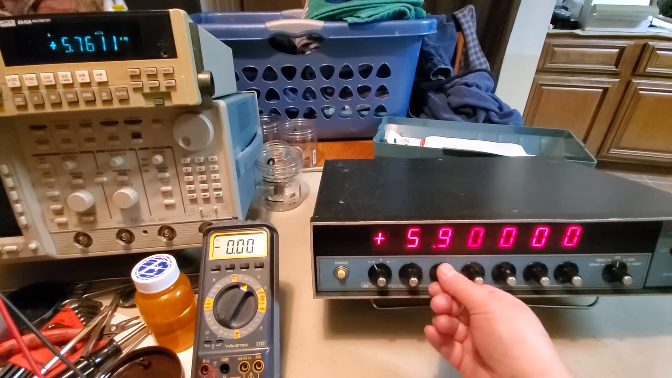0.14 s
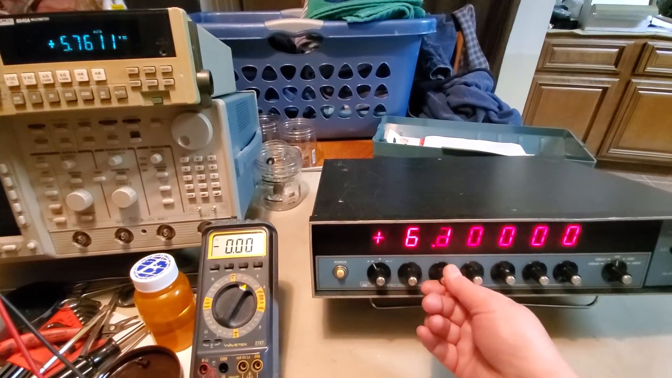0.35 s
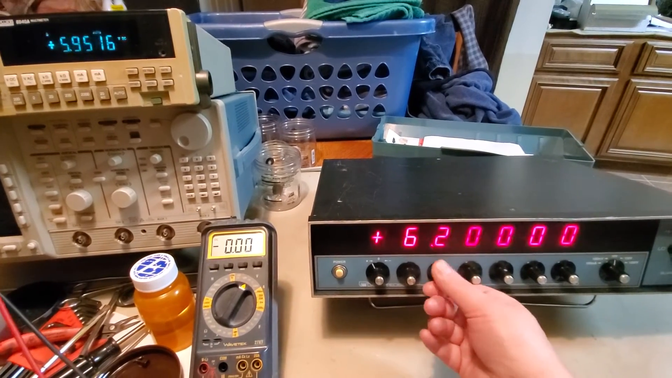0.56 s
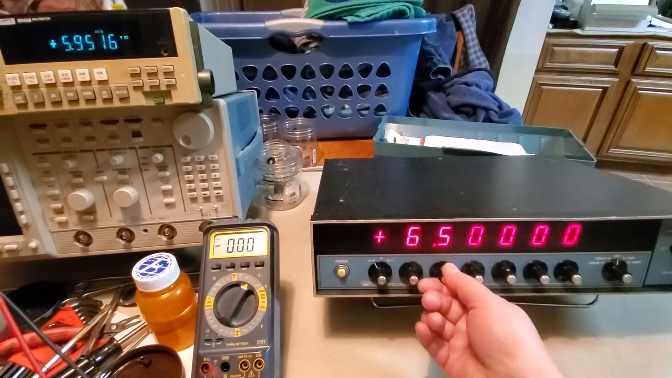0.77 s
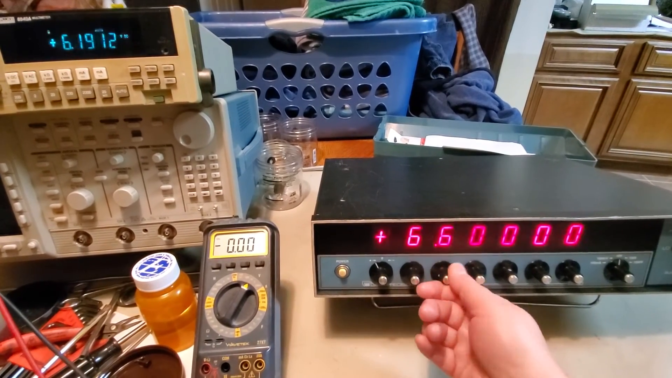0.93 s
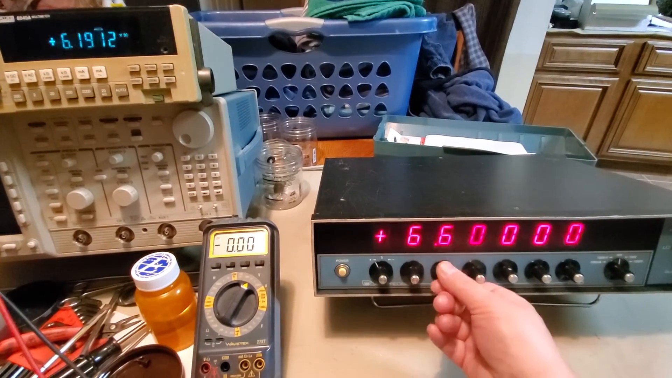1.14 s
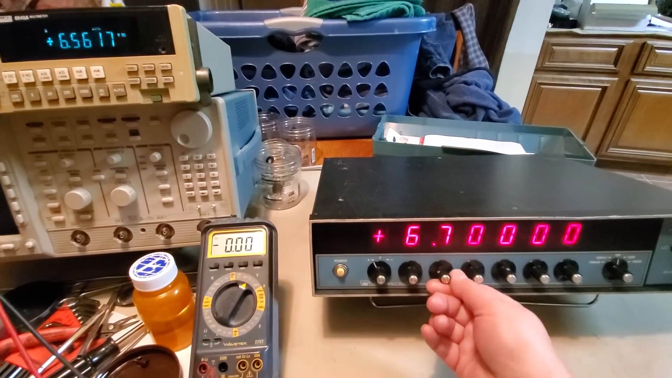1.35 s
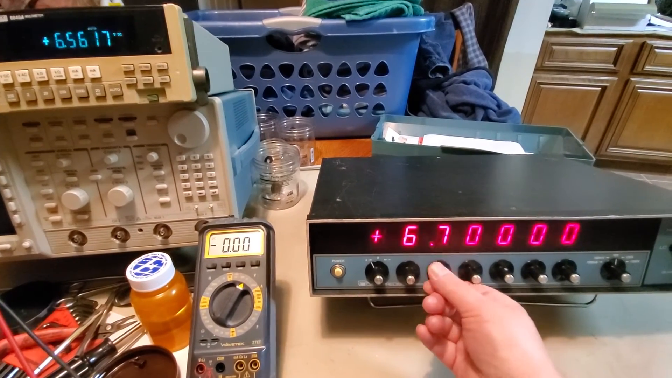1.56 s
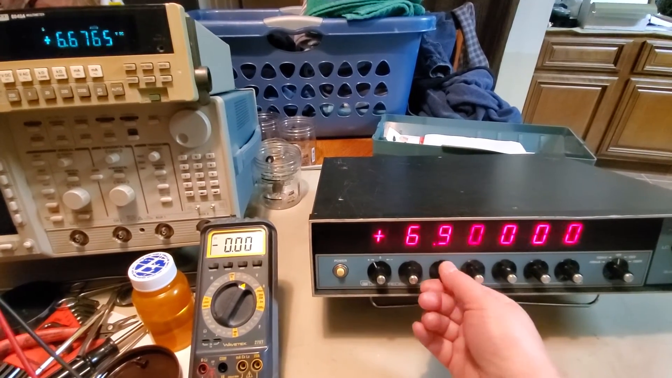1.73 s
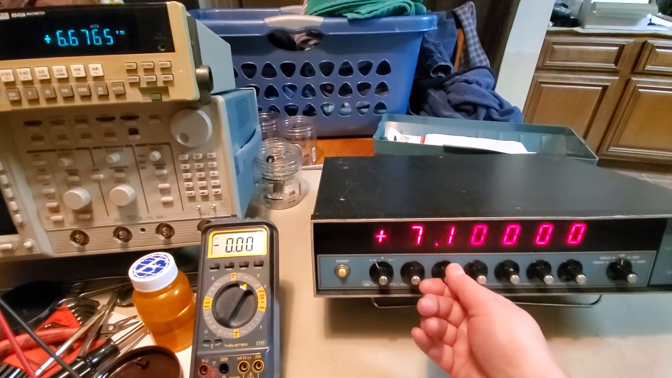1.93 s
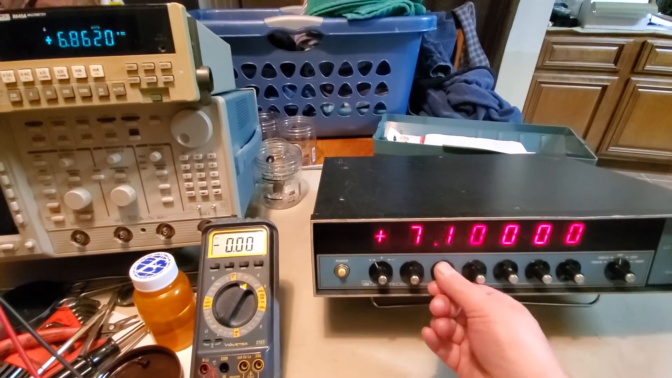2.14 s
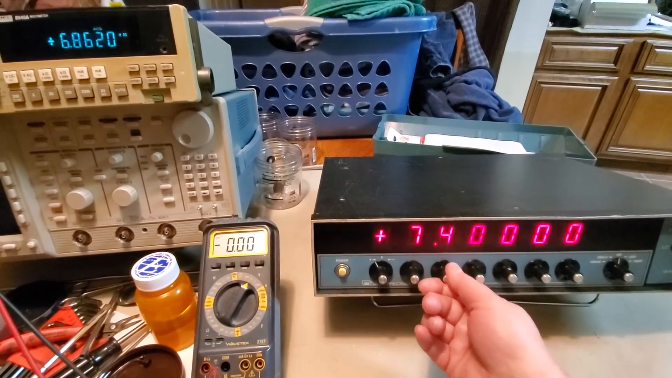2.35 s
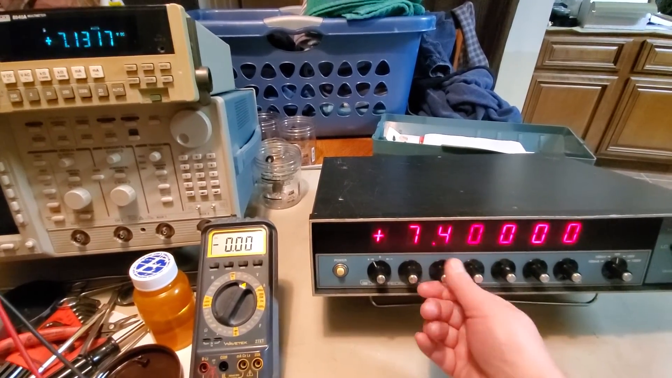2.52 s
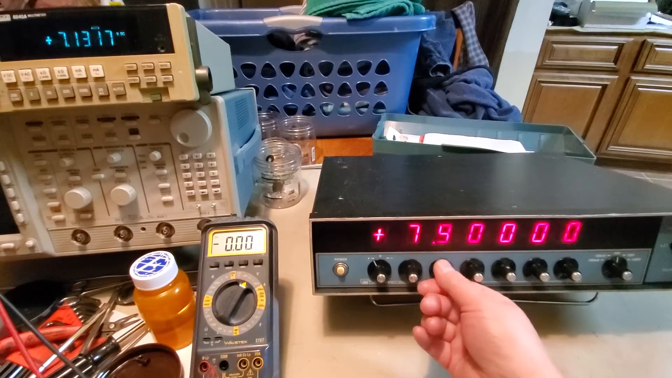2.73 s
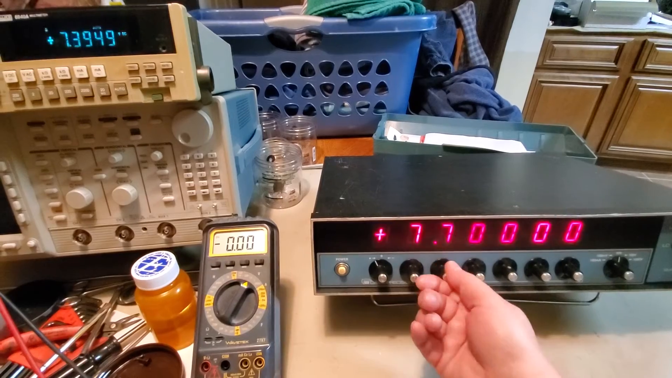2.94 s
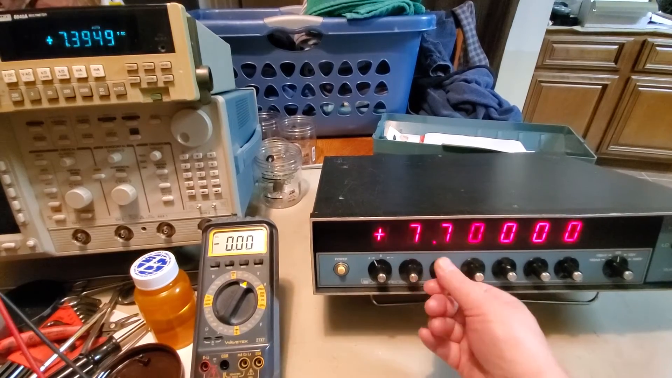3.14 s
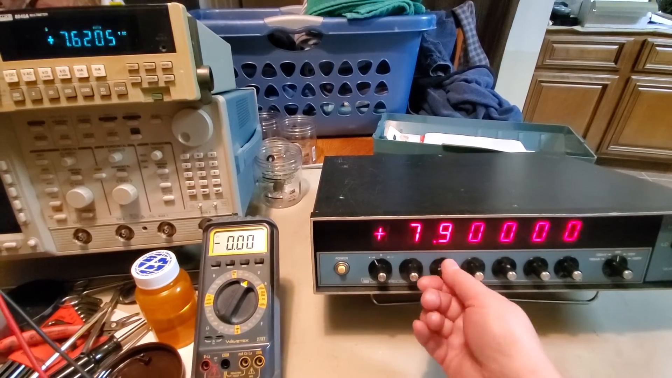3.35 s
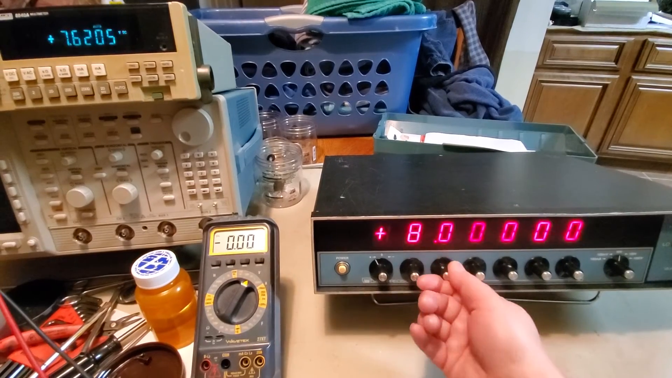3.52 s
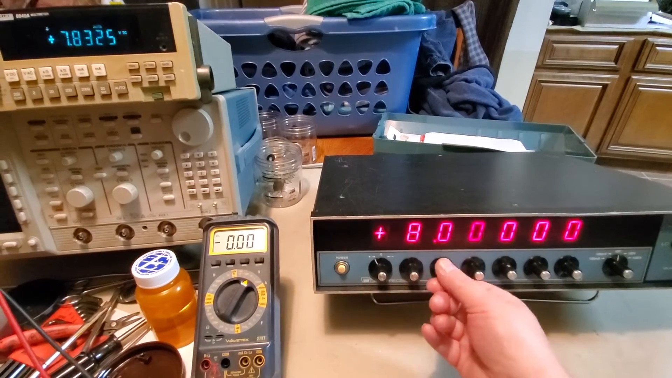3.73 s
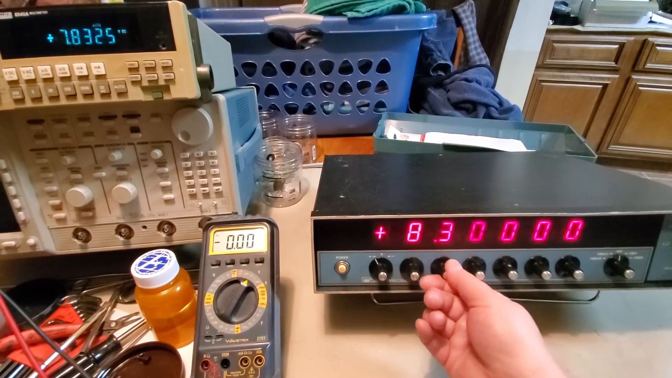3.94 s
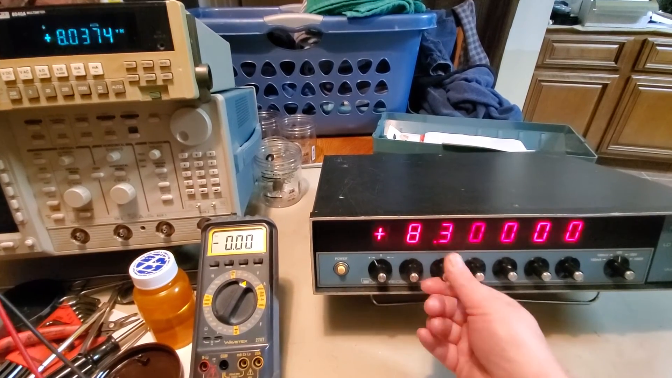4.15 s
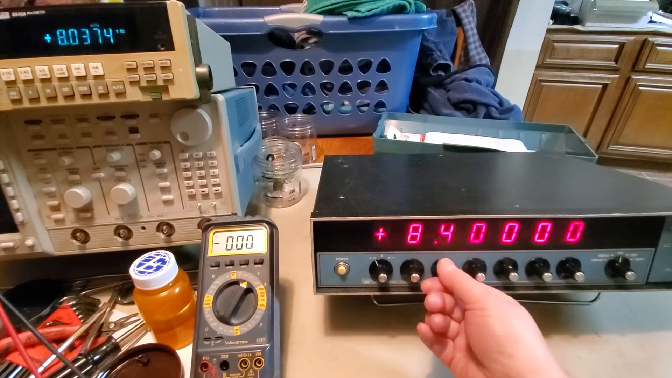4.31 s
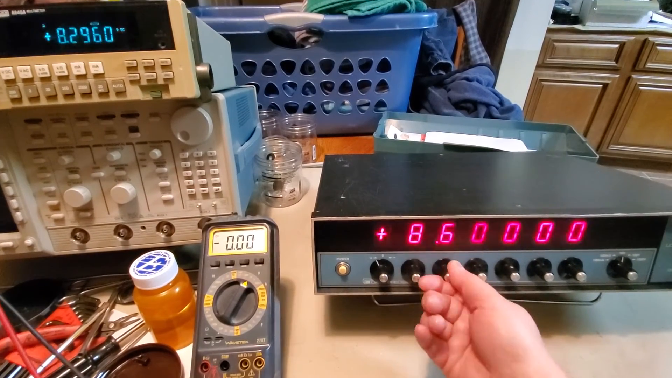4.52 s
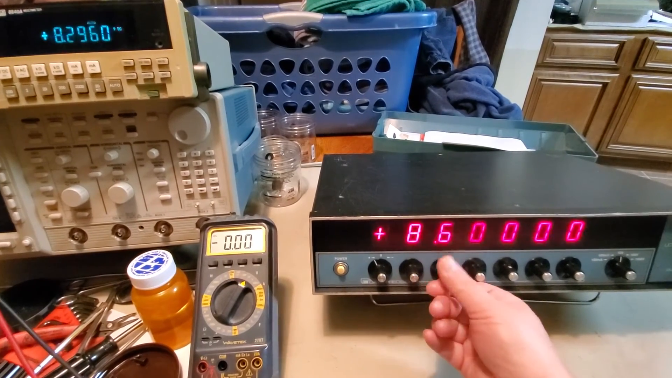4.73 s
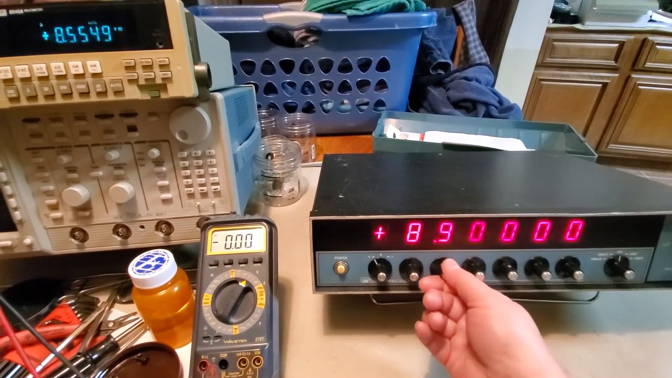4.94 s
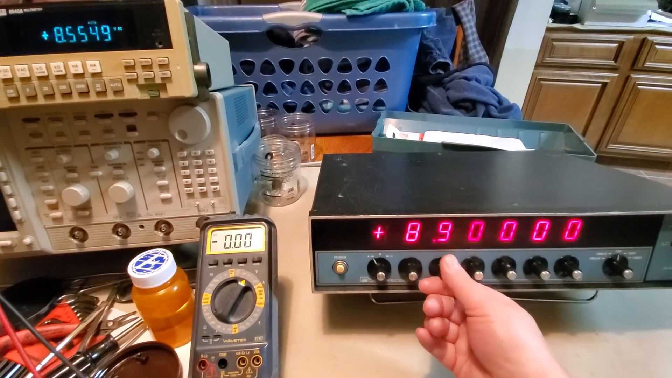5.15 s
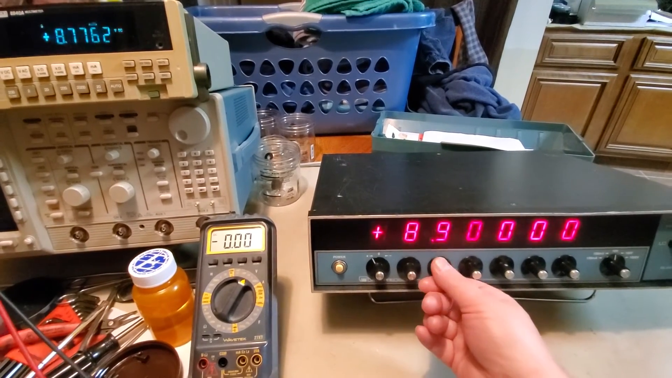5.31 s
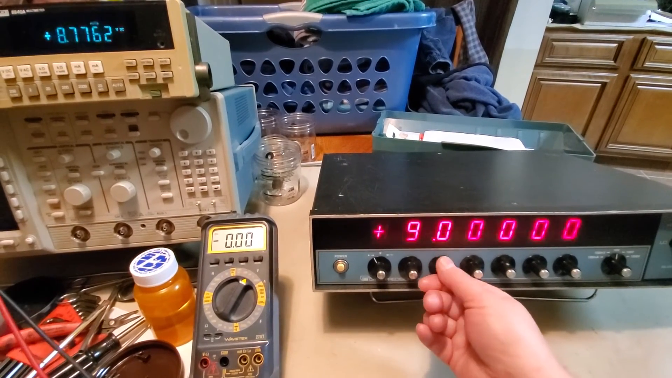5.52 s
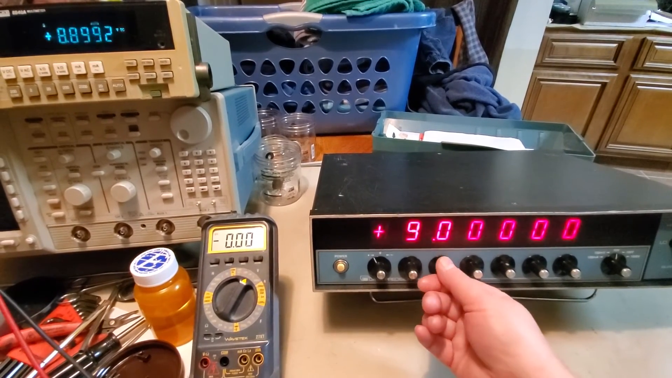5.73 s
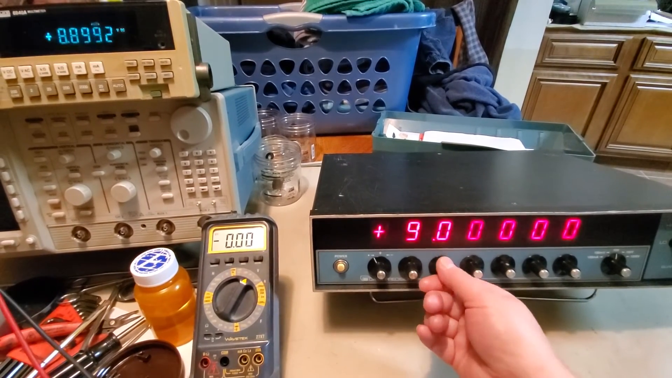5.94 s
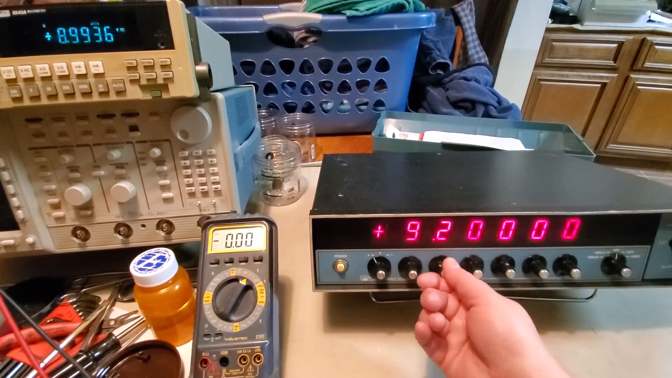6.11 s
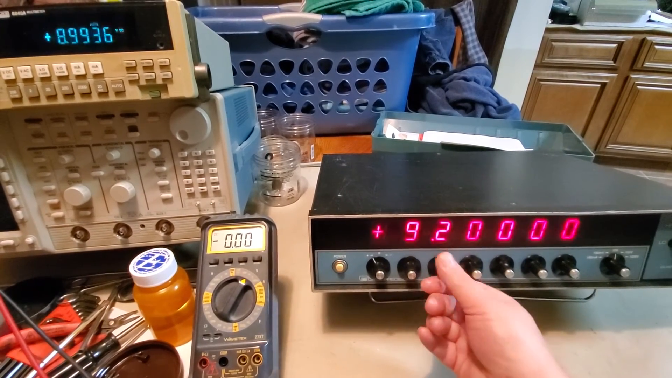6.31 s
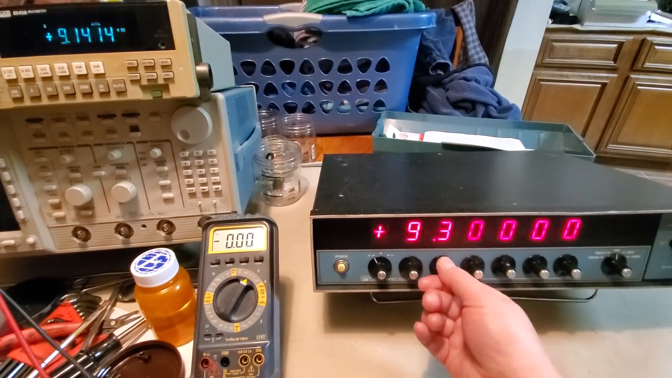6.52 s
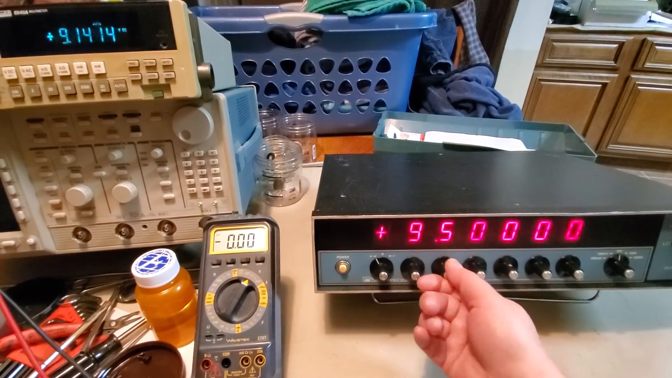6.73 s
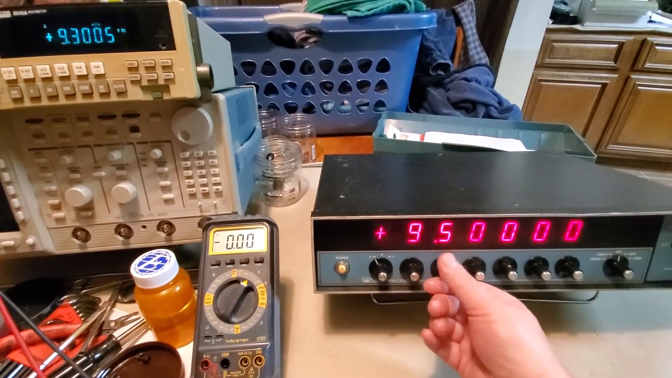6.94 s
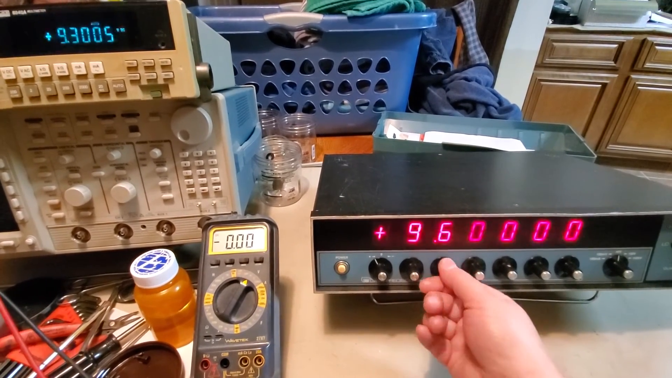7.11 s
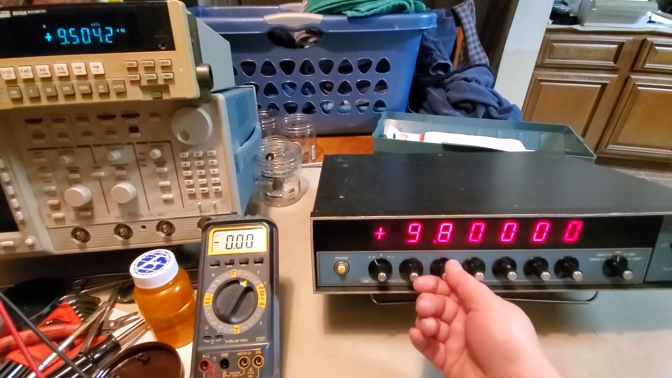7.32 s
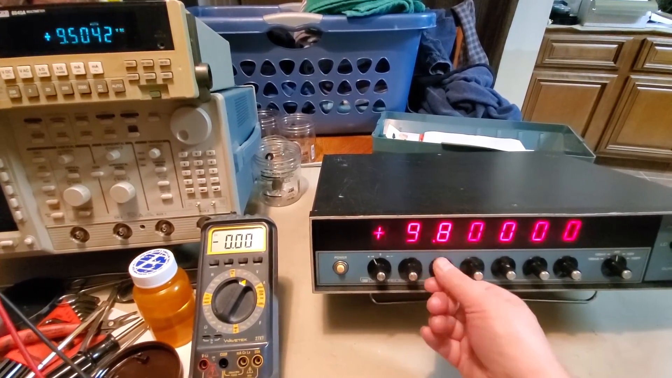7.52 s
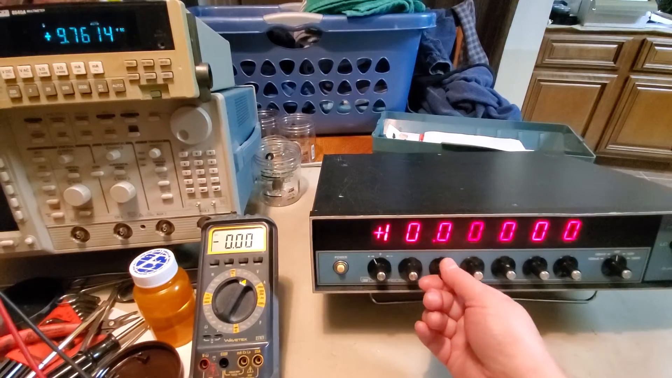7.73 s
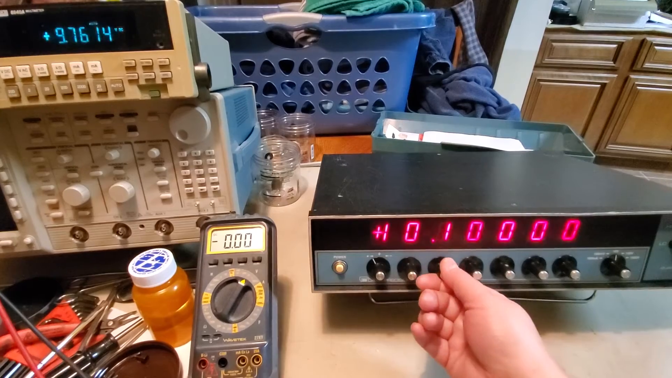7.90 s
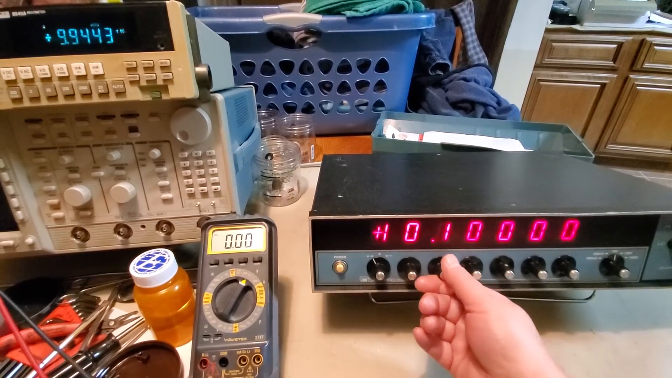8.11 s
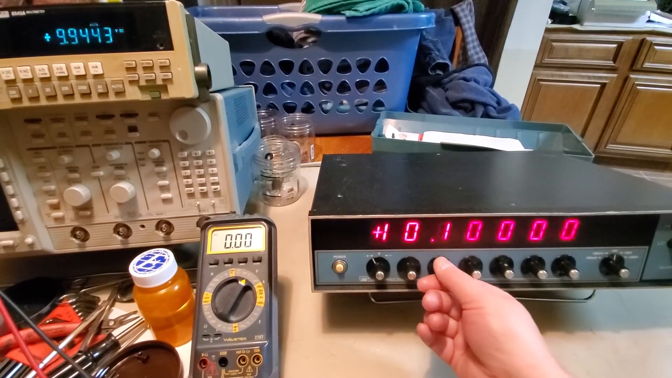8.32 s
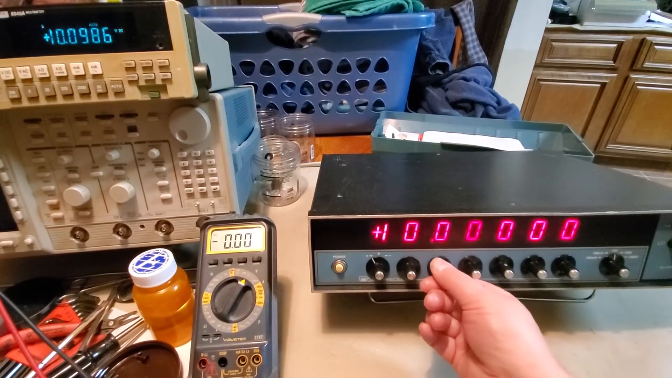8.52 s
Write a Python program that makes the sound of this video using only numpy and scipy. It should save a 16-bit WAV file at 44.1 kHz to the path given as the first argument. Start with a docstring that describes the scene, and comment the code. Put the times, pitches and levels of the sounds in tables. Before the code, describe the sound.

A detented rotary knob on a metal electronics case is clicked around in quick bursts of two or three crisp steps, over a quiet low hum.

```python
"""Detented rotary switch on a sheet-metal case

A switch left of a two-port microphone is turned in bursts of steps; the wheel's slack ticks faintly.
Each step rings spring and case modes under a noise crack; a small room answers with noise tails.
Fingers and wheel rub as gritty noise; one cluster of knocks sounds decaying bench modes.
Behind: wavering sines for motor, hums, whine and deep swells; shaped noise for rumble, fans and hiss.
"""
import sys
import numpy as np
from scipy import signal
from scipy.fft import rfft, irfft, next_fast_len
from scipy.io import wavfile
from scipy.ndimage import uniform_filter1d, map_coordinates

SR = 44100
rng = np.random.default_rng(int(sys.argv[2]) if len(sys.argv) > 2 else 0)


def volts(x):
    """Linear amplitude factor 10**(x/20) for a level x in dB, scalar or array-like."""
    e = np.asarray(x, float) / 20
    return 10 ** e


def store_pcm(level_fs):
    """Save levels as 16-bit WAV."""
    pcm = np.round(np.clip(level_fs, -1, 1) * 32767).astype(np.int16)
    wavfile.write(sys.argv[1], SR, np.atleast_2d(pcm).T)


N = 377580

# detent steps; last three relative to level_db: start_s, level_db, case_db, fizz_db, body_db
STEPS = [(0.2335, -25.5, -8, -8, -18.5), (0.3055, -24.5, -13.5, -12, -13.5), (0.4508, -27, -6.5, -7, -13.5),
         (0.7407, -24, -9.5, -9, -16), (0.7709, -22, -7, -9, -12.5), (0.7999, -23.5, -6.5, -6.5, -23),
         (0.8912, -26, -10, -8.5, -20), (1.259, -21.5, -12, -16, -16.5), (1.722, -27, -8, -12.5, -15.5),
         (1.7694, -25.5, -9, -9.5, -17), (1.8289, -23, -11.5, -11, -18), (2.2438, -25, -9, -11.5, -21.5),
         (2.2911, -20.5, -5, -7, -23.5), (2.323, -22, -4.5, -8, -24.5), (2.393, -26, -9.5, -8.5, -18.5),
         (2.8048, -23, -8.5, -10.5, -19), (2.8752, -24, -12.5, -11.5, -22.5),
         (2.9578, -26.5, -8, -9, -23.5), (3.3401, -20, -10.5, -11, -14), (3.381, -27.5, -2.5, -7, -11),
         (3.467, -28.5, -8.5, -9.5, -14), (3.8769, -24, -4.5, -11, -16.5), (3.918, -25, -8.5, -7.5, -20.5),
         (3.986, -27, -8, -8.5, -16), (4.388, -26.5, -4.5, -4, -13), (4.4233, -22.5, -10.5, -11.5, -19),
         (4.4817, -25, -10, -8.5, -14.5), (4.8975, -25, -8, -10.5, -20), (4.9326, -23, -10.5, -8.5, -16.5),
         (4.9768, -24.5, -10, -11, -19.5), (5.5967, -26.5, -10, -12, -22.5),
         (6.0374, -29.5, -9, -11, -21.5), (6.155, -27, -13, -15.5, -21.5), (6.572, -25.5, -7, -9, -15.5),
         (6.623, -27, -7, -9, -19.5), (6.7244, -27, -7, -7, -20), (7.152, -24, -6.5, -9.5, -18),
         (7.2076, -26, -11, -10.5, -14.5), (7.293, -25.5, -10, -10.5, -15.5),
         (7.7041, -25.5, -3.5, -9, -15.5), (7.7668, -24.5, -6, -6, -18.5),
         (7.8828, -27.5, -10.5, -9.5, -20.5), (8.5554, -32.5, -5.5, -11, -17.5)]
# faint ticks of slack in the wheel, same columns: start_s, level_db, case_db, fizz_db, body_db
TICKS = [(0.7123, -54, 13.5, -9.5, 7), (0.984, -61.5, 4, 2.5, 32), (1.2012, -53.5, 12, -11.5, 22),
         (1.218, -63, 15.5, -7.5, 9), (1.3365, -36.5, 2, -10.5, 8.5), (1.459, -64.5, 6.5, 10, 2),
         (2.7683, -51, 11, -13, 10), (3.8083, -66, 3.5, 17.5, 0.5), (3.8156, -61, 17.5, 9.5, 20),
         (5.9995, -58.5, 10, -15, -12.5), (6.4807, -62.5, 5, -9, 16), (6.521, -50, 3.5, -10, -1.5),
         (7.0975, -64.5, 16, -2, 29), (7.6605, -51.5, 5.5, -17.5, 9)]
# detent spring and wheel modes: pitch_hz, level_db, t60_s
SPRING_MODES = [(4756, -8.5, 0.038), (4926, -4.5, 0.045), (5326, -3, 0.026), (5630, 1, 0.037),
                (5925, 0, 0.016), (6254, 1.5, 0.012), (6680, -5, 0.024)]
# sheet-metal case modes: pitch_hz, level_db, t60_s
CASE_MODES = [(1449, -7.5, 0.13), (1811, -3.5, 0.1), (1994, -4.5, 0.099), (2472, -1.5, 0.056),
              (2732, -4.5, 0.087), (2933, 2.5, 0.062), (3400, -27.5, .04), (3958, 3, 0.05), (4300, -6, .04)]
# contact crack, relative spectrum: freq_hz, level_db
CRACK_SPECTRUM = [(290, -49), (500, -26), (731, -30.5), (1430, -14), (2390, -7), (2980, 7), (3600, -6),
                  (4900, 0), (6660, -2.5), (7270, -9.5), (14700, -11.5), (15800, -29), (16500, -54)]
# contact crack decay: freq_hz, t60_s
CRACK_DECAY = [(800, 0.33), (2500, 0.066), (6000, 0.038), (9000, 0.057), (14000, 0.059)]
# left minus right level: freq_hz, level_db
PORT_LEAN = [(700, -13), (1300, -3), (2400, 6), (4400, 3.5), (8000, -5), (15000, -0.5)]
# phase by which the left port leads: freq_hz, lead_rad
PORT_LEAD = [(0, 0), (1000, -.2), (1720, -1.2), (2400, -.4), (3100, 3), (3800, 1.6), (4480, -.4),
             (5170, -3.4), (5860, -2.3), (6550, .8), (7240, .8), (8300, -1.5), (9700, 1.4), (11400, .5),
             (12800, -1.8)]
# room decay: freq_hz, t60_s
ROOM_DECAY = [(300, 0.32), (1300, 0.61), (3500, 0.27), (5700, 0.19), (9000, 0.29), (16000, 0.15)]
# finger and wheel rubs; brightness is at 7 kHz and up: start_s, level_db, length_s, bright_db
RUBS = [(.155, -55.5, 0.12, 6), (0.388, -58.5, .05, 11.5), (0.704, -55.5, 0.027, -4),
        (1.21, -52, 0.046, 1.5), (1.312, -40.5, .05, 4.5), (1.359, -56, 0.053, 5.5),
        (1.69, -63.5, 0.038, -1), (.92, -58.5, 0.055, 0.5), (1.935, -55.5, .06, 9), (2.201, -59, 0.047, 2),
        (2.751, -54, 0.04, 2.5), (3.296, -55, 0.047, -3), (3.843, -60.5, 0.031, 3), (4.345, -58, .035, 1.5),
        (4.86, -61, 0.047, -3), (5.102, -60.5, .08, -3), (5.469, -63, 0.079, 10), (5.985, -59, 0.044, 6),
        (6.481, -53, 0.064, -2.5), (6.52, -63, 0.057, 4), (7.093, -57, 0.064, 1), (7.655, -59, 0.033, 2),
        (8.312, -61.5, .03, -10)]
# rub noise, relative spectrum: freq_hz, level_db
RUB_SPECTRUM = [(300, -37), (700, -3.5), (1300, -0.5), (2000, 2.5), (3000, -5.5), (5000, -12), (12000, -26),
                (16000, -38.5)]
# case on bench: start_s, level_db, tilt_db_per_octave
KNOCKS = [(1.244, -45.5, 5), (1.265, -36.5, 4), (1.317, -42, -6), (1.329, -34.5, -1), (1.339, -27.5, 3),
          (1.374, -49.5, 9.5), (1.395, -44.5, 4)]
# bench top modes: pitch_hz, level_db, t60_s
BENCH_MODES = [(134.4, -13.5, 0.36), (185, -5.5, 0.2), (212.1, -2, 0.23), (263.8, -3.5, 0.22),
               (288.2, 6, 0.088), (340.8, -11, 0.21), (477.7, 2, 0.068), (560, -10, 0.089), (742, -9, .05),
               (1010, -16, 0.058)]
# far motor level: time_s, level_db
MOTOR_LEVEL = [(0, -49.5), (.43, -45.5), (.9, -51), (1.8, -48), (2.5, -52), (2.65, -60), (2.88, -50),
               (3.4, -62.5), (4.2, -64), (4.8, -65), (5.03, -51), (5.2, -62.5), (5.5, -57), (6.1, -63),
               (7.3, -60), (7.7, -63.5), (8, -57), (8.56, -72.5)]
# hums at rest and per unit of wake power: pitch_hz, rest_db, wake_db
HUMS = [(41.5, -68.5, -80.5), (96.2, -69, -68.5), (115.2, -67, -70.5), (145.7, -72, -75),
        (243.2, -66.5, -60.5)]
# hum wake: rise_s, fall_s
HUM_WAKE = (0.045, .08)
# thin whine of transformers and fans: pitch_hz, level_db
WHINE = [(559.9, -80.5), (1039, -85.5), (1195, -83.5), (1680, -88.5), (1922, -83.5), (2040, -82),
         (2159, -88.5), (2622, -83)]
# deep tones, perhaps traffic: middle_s, pitch_hz, level_db, length_s
SWELLS = [(.35, 48.6, -54, 0.8), (1.3, 56.1, -61, 0.62), (1.596, 48.3, -60, 0.48), (2.267, 45, -53, .25),
          (2.501, 55.56, -57, 1.1), (2.851, 48.1, -56, .4), (3.1, 56.1, -54, 1.34), (4.014, 56.9, -61, 1.8),
          (5.104, 48, -59.5, .4), (5.097, 56.8, -64.5, 0.48), (5.5, 41.5, -50, 1.02),
          (6.13, 41.5, -55.5, .5), (6.656, 41.5, -54.5, 0.68), (7.146, 56.4, -57, 0.59),
          (7.491, 41.5, -59, 0.32), (7.749, 56.1, -62, .4)]
# background noise at rest: time_s, rumble_db, fan_db, hiss_db
AIR_LEVELS = [(0, -52, -63.5, -70), (1, -54, -63.5, -70.5), (2.2, -54, -63.5, -73), (3.3, -55, -63.5, -70),
              (4.7, -56, -64, -72.5), (5.8, -56, -65, -75.5), (6.9, -58, -65, -72.5),
              (8.56, -59.5, -67, -75)]
# wake of rumble, fans and hiss, one row each: level_db, rise_s, fall_s
AIR_WAKE = [(-55.5, 0.021, .08), (-54, 0.032, 0.039), (-61, .03, 0.054)]
# rumble, relative spectrum: freq_hz, level_db
RUMBLE_SPECTRUM = [(13, -40.5), (22, -13.5), (49, 1.5), (118, -2), (152, -8.5), (175, -8.5), (188, -10.5),
                   (245, -2), (272, -8), (450, -26), (580, -61.5), (990, -120)]
# fan rush, relative spectrum: freq_hz, level_db
FAN_SPECTRUM = [(240, -59.5), (400, -7), (548, -4.5), (828, -6.5), (905, -11.5), (1160, -6), (1450, -5.5),
                (1970, -6.5), (4200, -16), (5460, -63.5), (9240, -120)]
# hiss, relative spectrum: freq_hz, level_db
HISS_SPECTRUM = [(2240, -54.5), (3800, -28.5), (4560, -2), (5610, -6.5), (10100, -14.5), (11400, -10),
                 (12000, -7.5), (12500, -6.5), (13600, -10.5), (16300, -17.5)]
# left-right likeness of background noise: freq_hz, correlation
LIKENESS = [(60, 0.92), (300, 0.92), (640, .5), (1400, -0.37), (3100, 0.19), (7000, 0)]


def knob():
    """Spring snaps at once, case swells a little later, contact cracks, bench thuds, room answers."""
    out = np.zeros((2, N))
    t = np.arange(SR // 10) / SR
    side = volts([[2.6], [-2.6]])  # left of the microphone
    # in a tick the parts stay pressed together: extra damping, weaker ringing
    tick_t60_s, tick_ring_db = 0.051, -8
    tick_damping = volts(-60 * t / tick_t60_s)
    contacts = [(row, 1, 1) for row in STEPS]
    contacts += [(row, tick_damping, volts(tick_ring_db)) for row in TICKS]
    for (s, db, case_db, fizz_db, body_db), damping, ringing in contacts:
        metal = snap(t) + case(t, case_db, body_db)
        step = (ringing * metal + crack(t, case_db, fizz_db, body_db)) * damping
        add(out, volts(db) * side * step, s - 0.0008)
        add(out, volts(db - 25) * thud(tilt_db=-3.5, rise_s=0.013, scatter_db=3.5), s)
        # the walls answer the first sharp 5 ms
        add(out, volts(db - 10) * room(step[0, :SR // 200]), s + 0.004)
    return out


def snap(t):
    """The released spring rings with its wheel."""
    return chatter(ring(SPRING_MODES, t, cycles=3.6, spread_rad=1.0), settle_s=0.004)


def case(t, case_db, body_db):
    """Sheet-metal modes, balanced between body below 1.8 kHz and case above 2.4 kHz."""
    balance = [(1800, body_db + 6.5), (2400, case_db)]
    panel = [(hz, db + along(balance, hz), t60) for hz, db, t60 in CASE_MODES]
    return volts(-4) * chatter(ring(panel, t, cycles=2.8, spread_rad=0.69), settle_s=0.009)


def crack(t, case_db, fizz_db, body_db):
    """Contact noise with a sharp onset, coloured from the body below to the fizz on top."""
    colour = [(1500, body_db + 17.5), (2900, case_db + 12), (5600, 9.7), (9000, fizz_db + 18)]

    def level_db(hz):
        lean_db = np.outer([0.5, -0.5], along(PORT_LEAN, hz))
        return along(CRACK_SPECTRUM, hz) + along(colour, hz) + lean_db

    onset = 1 + 0.97 * np.exp(-t / 0.0013)
    rattle = grit(len(t), depth_db=2, span_s=0.00089)
    noise = fading(CRACK_DECAY, level_db, len(t), alike=0.62, cycles=5)
    return volts(-1.5) * onset * rattle * noise


def ring(modes, t, cycles, spread_rad):
    """Modes at random strengths; loose parts blur their phase, each reaches the ports at its own balance."""
    hz, db, t60 = np.transpose(modes)[:, :, None]
    size, phase, turn = rng.standard_normal((3, len(modes), 1))
    fade = volts(db + 2 * size - 60 * t / t60) * (1 - np.exp(-t * hz / cycles))
    blur = 0.095 * np.cumsum(rng.standard_normal(fade.shape), 1)
    angle = 2 * np.pi * hz * t + 3 * phase + blur
    lean = volts(along(PORT_LEAN, hz) / 2)
    lead = np.interp(hz, *np.transpose(PORT_LEAD)) + spread_rad * turn
    left = np.sum(fade * lean * np.sin(angle), 0)
    right = np.sum(fade / lean * np.sin(angle - lead), 0)
    return np.array([left, right])


def chatter(sound, settle_s, count=5):
    """The ball bounces a few times in its notch, which blurs the ringing."""
    when, size = rng.random((2, count))
    blows = np.zeros(SR // 50)
    index = np.minimum(when * settle_s * SR, len(blows) - 1).astype(int)
    blows[index] = (2 * size - 1) * (1 - 1.22 * when)
    blows[0] = 1
    blows /= np.linalg.norm(blows)
    return signal.fftconvolve(sound, blows[None], axes=1)[:, :sound.shape[1]]


def room(x):
    """Diffuse reflections: a new noise tail on each side, in the broad colour of the sound."""
    power = uniform_filter1d(np.abs(rfft(x, 512)) ** 2, size=8)
    bins_hz = np.fft.rfftfreq(512, 1 / SR)

    def level_db(hz):
        return 10 * np.log10(np.interp(hz, bins_hz, power) + 1e-12)

    tail = fading(ROOM_DECAY, level_db, SR // 5, size=128)
    return tail * np.linalg.norm(x) / np.linalg.norm(tail[0])


def rubs():
    """Skin and wheel drag: gritty noise under a rounded stroke."""
    out = np.zeros((2, N))
    for s, db, length_s, bright_db in RUBS:
        size = round(length_s * SR) + 300

        def level_db(hz):
            lean_db = np.outer([0.5, -0.5], along(PORT_LEAN, hz) + 5)
            return along(RUB_SPECTRUM, hz) + along([(3000, 0), (7000, bright_db)], hz) + lean_db

        # a t60 of 110 s: practically no decay
        noise = unit(fading([(1000, 110)], level_db, size, alike=0.9))
        stroke = np.sqrt(np.sin(np.pi * np.arange(size) / size))
        add(out, volts(db) * noise * stroke * grit(size, depth_db=2.5, span_s=0.002), s)
    return out


def knocks():
    """The case rocks on its feet: soft low blows into the bench top."""
    out = np.zeros((2, N))
    for s, db, tilt_db in KNOCKS:
        add(out, volts(db) * thud(tilt_db, rise_s=0.00225, scatter_db=2.5), s)
    return out


def thud(tilt_db, rise_s, scatter_db):
    """One soft blow rings the bench modes, alike at both ports; the tilt is per octave about 300 Hz."""
    hz, db, t60 = np.transpose(BENCH_MODES)[:, :, None]
    t = np.arange(SR // 5) / SR
    db = db + tilt_db * np.log2(hz / 300) + scatter_db * rng.standard_normal(hz.shape)
    modes = volts(db - 60 * t / t60) * np.sin(2 * np.pi * hz * t)
    return np.sum(modes * (1 - np.exp(-t / rise_s)), 0, keepdims=True)


def motor():
    """A far motor: a fundamental and its octave under a varying level."""
    pitch_hz, octave_db = 81.7, -15.5
    level = volts(curves(MOTOR_LEVEL)[0])
    return level * (tone(pitch_hz) + volts(octave_db) * tone(2 * pitch_hz))


def hums():
    """Fan hums that the steps stir up through the case."""
    stirred = wake(*HUM_WAKE)
    out = np.zeros(N)
    for hz, rest_db, wake_db in HUMS:
        level = np.sqrt(volts(2 * rest_db) + volts(2 * wake_db) * stirred)
        out += level * volts(2.5 * wobble(4.6)) * tone(hz)
    return out


def whine():
    """Thin wavering sines of transformers and fans."""
    return sum(volts(db) * tone(hz) for hz, db in WHINE)


def swells():
    """Deep tones that each rise and sink once, under a half-sine envelope."""
    out = np.zeros((1, N))
    t = np.arange(2 * SR) / SR
    for middle_s, hz, db, length_s in SWELLS:
        envelope = np.sin(np.pi * np.clip(t / length_s, 0, 1))[None]
        add(out, volts(db) * envelope * tone(hz, len(t)), max(middle_s - length_s / 2, 0))
    return out


def background():
    """Rumble, fan rush and thin hiss; hand, bench and room add to each in the wake of the steps."""
    levels = []
    for rest_db, (db, rise_s, fall_s) in zip(curves(AIR_LEVELS), AIR_WAKE):
        levels.append(np.sqrt(volts(2 * rest_db) + volts(2 * db) * wake(rise_s, fall_s)))
    rumble, fans, hiss = levels
    rumble = rumble * volts(1.1 * wobble(6.5)) * rush(RUMBLE_SPECTRUM)
    fan_flutter_db = 0.94 * wobble(12) + 1.1 * wobble(4.034) + 0.97 * wobble(70)
    fans = fans * volts(fan_flutter_db) * rush(FAN_SPECTRUM)
    hiss = hiss * volts(0.8 * wobble(58) + 1.1 * wobble(2.6)) * rush(HISS_SPECTRUM)
    return rumble + fans + hiss


def wake(rise_s, fall_s):
    """Power that lingers after the steps: each adds a share that swells and dies away."""
    s, db = np.transpose(STEPS)[:2]
    # a step of -25 dB counts as one
    blows = np.bincount((s * SR).astype(int), volts(db + 25) ** 2, N)
    t = np.arange(SR) / SR
    share = (1 - np.exp(-t / rise_s)) * np.exp(-t / fall_s)
    return np.abs(signal.fftconvolve(blows, share)[:N])


def rush(spectrum):
    """Stereo noise of rms 1, its left-right likeness set per frequency by mid and side shares."""
    m = next_fast_len(N)
    hz = np.fft.rfftfreq(m, 1 / SR)
    turn = np.arccos(np.clip(along(LIKENESS, hz), -1, 1)) / 2
    gain = volts(along(spectrum, hz)) * [np.cos(turn), np.sin(turn)]
    mid, side = irfft(rfft(rng.standard_normal((2, m))) * gain, m)[:, :N]
    return unit(np.array([mid + side, mid - side]))


def fading(t60, level_db, length, alike=0, cycles=0.01, size=64):
    """Two noises whose every frequency swells over some cycles and dies at its own speed."""
    hz, t, z = signal.stft(rng.standard_normal((2, length)), SR, nperseg=size)
    # a share of the first noise reaches the second port, later by the lead
    lag = np.exp(-1j * np.interp(hz, *np.transpose(PORT_LEAD)))[:, None]
    z[1] = alike * z[0] * lag + np.sqrt(1 - alike ** 2) * z[1]
    gain = volts(level_db(hz)[..., None] - 60 * t / along(t60, hz)[:, None])
    swell = 1 - np.exp(-np.outer(hz, t) / cycles)
    return signal.istft(z * gain * swell, SR, nperseg=size)[1][:, :length]


def grit(size, depth_db, span_s):
    """Uneven gain that turns smooth noise into crackle."""
    uneven = unit(uniform_filter1d(rng.standard_normal(size), round(span_s * SR)))
    return unit(volts(depth_db * uneven))


def tone(hz, size=N):
    """A sine of nominal rms 1 that wavers a little in pitch and level."""
    level = np.sqrt(2) * volts(1.7 * wobble(7.2, size))
    return level * np.sin(2 * np.pi * hz * np.arange(size) / SR + 0.4 * wobble(3.7, size))


def wobble(rate_hz, size=N):
    """A smooth random curve through rate_hz knots a second."""
    knots = rng.standard_normal(int(size * rate_hz / SR) + 4)
    return map_coordinates(knots, [np.arange(size) * rate_hz / SR])


def unit(x):
    """Scaled to rms 1."""
    return x / np.sqrt(np.mean(x ** 2) + 1e-20)


def along(points, hz):
    """Values of (freq_hz, value) points, interpolated on a log frequency axis."""
    f, v = np.transpose(points)
    return np.interp(np.log(hz + 1), np.log(f + 1), v)


def curves(rows):
    """One value per sample for each column after the time."""
    s, *cols = np.transpose(rows)
    return [np.interp(np.arange(N) / SR, s, c) for c in cols]


def add(track, sound, s):
    """Mixes a sound in at time s, cut at the end of the track."""
    part = track[:, round(s * SR):][:, :sound.shape[1]]
    part += sound[:, :part.shape[1]]


def scene():
    """Sum of all sources, from the knob to the background."""
    tones = motor() + hums() + whine()
    return knob() + rubs() + knocks() + tones + swells() + background()


def roll_off(x):
    """The treble ends steeply here."""
    return signal.sosfilt(signal.butter(12, 16810, fs=SR, output="sos"), x)


def record(dry):
    """Delivers the finished stereo mix."""
    return roll_off(dry)


dry = scene()
out = record(dry)
store_pcm(out)
```